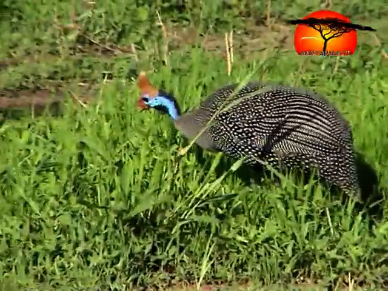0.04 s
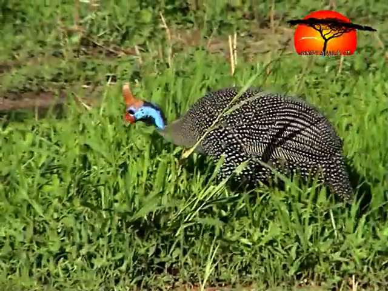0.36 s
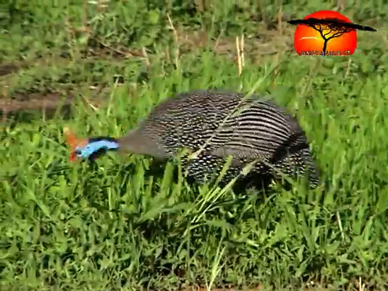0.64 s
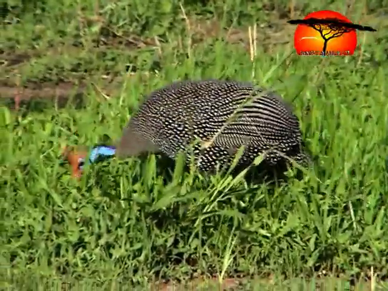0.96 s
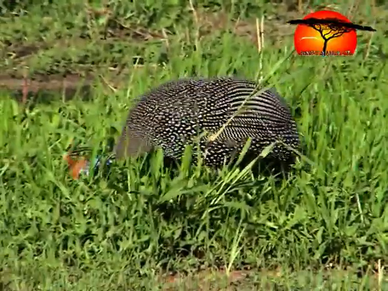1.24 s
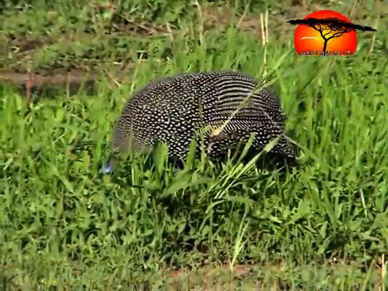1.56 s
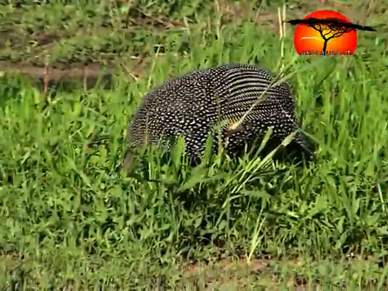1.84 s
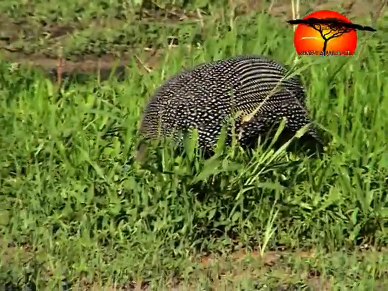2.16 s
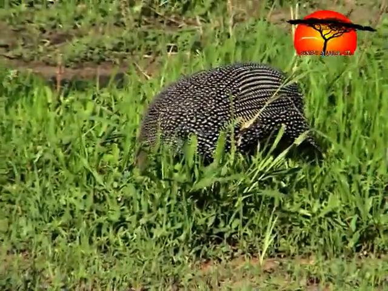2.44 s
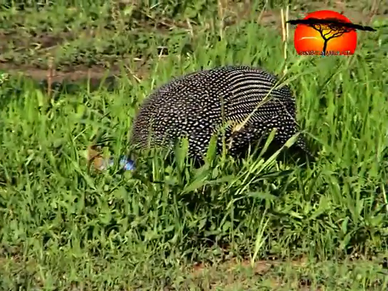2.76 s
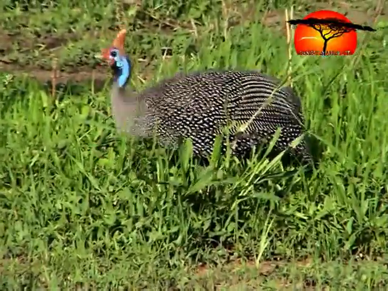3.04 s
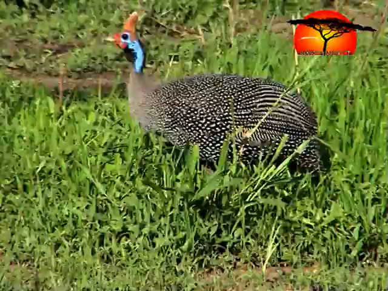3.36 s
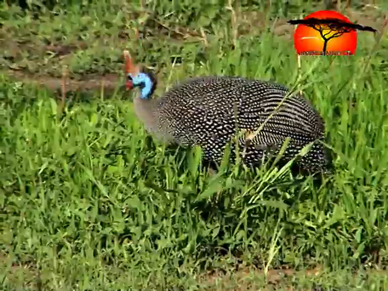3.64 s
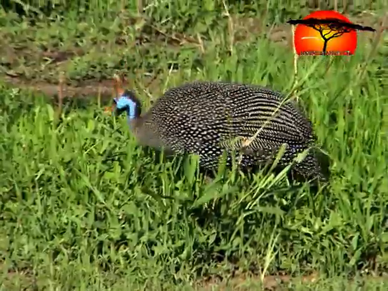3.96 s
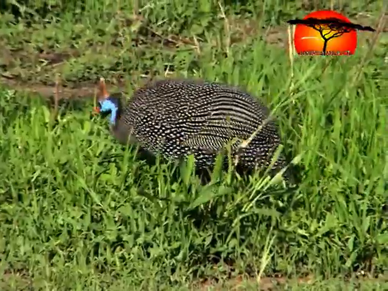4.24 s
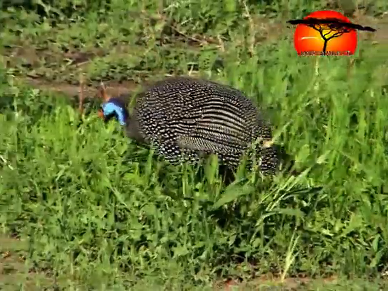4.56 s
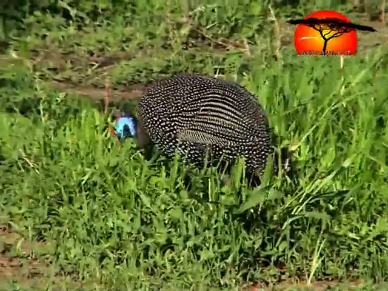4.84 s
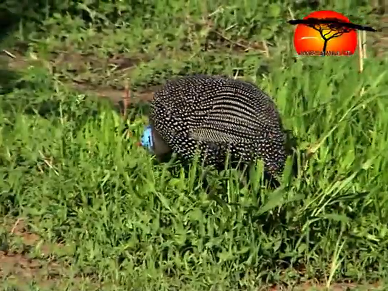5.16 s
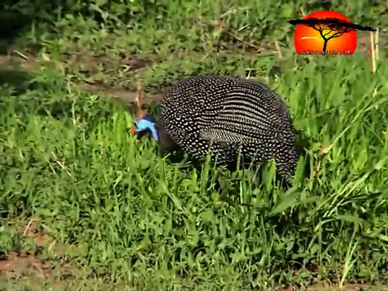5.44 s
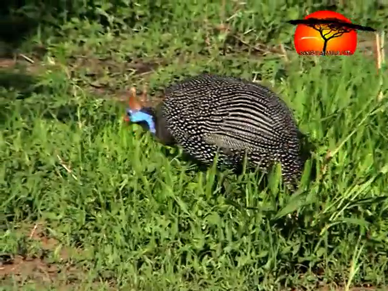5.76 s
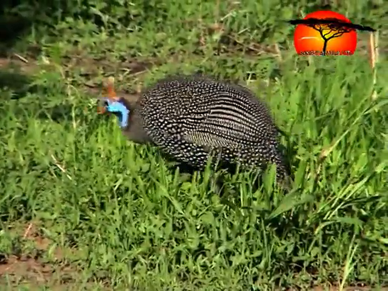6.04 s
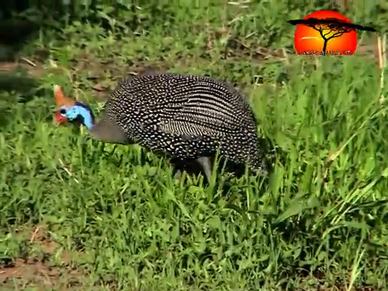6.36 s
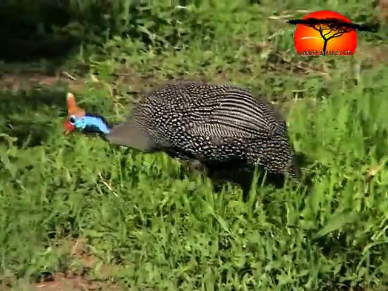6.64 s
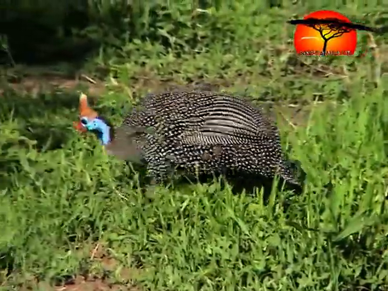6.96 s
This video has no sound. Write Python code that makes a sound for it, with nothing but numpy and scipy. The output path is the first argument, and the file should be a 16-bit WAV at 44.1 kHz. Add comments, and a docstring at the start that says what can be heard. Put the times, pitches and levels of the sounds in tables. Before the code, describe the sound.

Cicadas buzz, high and steady, across an open meadow. To the left a bird gives short raspy chirps twice a second and another answers with brief trills, while thin whistles come from far ahead. Wind gusts rumble and thump on the microphone, mostly in the first half. Just past the middle, something like a camera shutter clacks quickly up close. The wind then eases while the insects and birds carry on.

```python
"""Cicadas buzz all over a sunny meadow, clicking their tymbals, while gusts buffet the microphone.
To the left one bird chirps twice a second and another answers with short trills, both rasping as the
two sides of the syrinx beat. Far ahead are thin arched whistles, small peeps and a cooing dove.
Bush crickets sizzle and a fowl rustles the grass. Close by, a small mechanism like a camera shutter
gives one run of clacks, over the hush of open country and the recorder's faint whine."""
import sys
import numpy as np
from scipy import signal
from scipy.fft import rfft, irfft, next_fast_len
from scipy.io import wavfile
from scipy.ndimage import uniform_filter1d, map_coordinates

SR = 44100
rng = np.random.default_rng(int(sys.argv[2]) if len(sys.argv) > 2 else 0)


def output_pcm(signal):
    """Save a mono or channel-first signal as 16-bit PCM at the path in sys.argv[1].

    Samples are clipped to [-1, 1] before scaling.
    """
    pcm = np.clip(np.atleast_2d(signal).T, -1, 1) * 32767
    wavfile.write(sys.argv[1], SR, np.round(pcm).astype(np.int16))


N = 313110

# hush of open country: (frequency [Hz], relative level [dB])
AIR_SPECTRUM = [(20, -27.5), (100, -14), (250, 6), (500, 3.5), (950, 1.5), (1350, -1.5), (1800, -3.5),
                (2300, 0), (3600, -4), (5200, -5.5), (8000, -58), (10000, -10), (12000, -16)]
# how alike that hush is on both sides of the microphone: (frequency [Hz], correlation [0-1])
AIR_LIKENESS = [(100, 0.24), (500, 0.072), (1300, 0.041), (2700, 0.4), (6000, 0.59), (12000, 0.041)]
# tones of the recorder's whine: (frequency [Hz], level [dB])
WHINE_TONES = [(921, -75), (1016, -77.5), (3505, -77), (3600, -76.5), (4356, -76.5), (4576, -79),
               (4641, -81.5)]
# decay of sound off bushes and ground: (frequency [Hz], t60 [s])
MEADOW_DECAY = [(300, .3), (3000, 0.11), (10000, 0.027)]
# snapping stalks and soft steps in the grass: (time [s], level [dB], t60 [s], centre [Hz])
GRASS_RUSTLES = [(2.56, -53.5, 0.046, 2300), (2.702, -52, .04, 1280), (4.33, -58, .03, 10500),
                 (5.755, -52, 0.096, 2500), (6.405, -61, .03, 10500), (6.469, -56.5, .3, 440)]

# a far dove's run of coos: (time [s], pitch [Hz], level [dB])
DOVE_COOS = [(.23, 500, -66), (.315, 496, -66), (.395, 485, -64.5), (.48, 485, -68), (.565, 490, -66),
             (.65, 480, -66.5), (.74, 485, -67), (.84, 466, -68), (.94, 470, -67.5)]
# faint slurs from far off: (time [s], length [s], start pitch [Hz], end pitch [Hz], level [dB])
FAR_PEEPS = [(1.10, .06, 2720, 2580, -66), (1.10, .06, 4000, 3850, -66), (1.158, 0.015, 4900, 3500, -53),
             (1.345, .025, 5650, 5450, -58), (1.385, 0.034, 3400, 3900, -59),
             (1.407, 0.049, 3770, 4020, -57), (1.506, 0.04, 3080, 2700, -60),
             (3.145, 0.018, 4100, 4170, -58), (3.546, 0.023, 4400, 4300, -60),
             (4.325, .022, 4100, 4400, -61)]
# far whistles, all on the same note: (time [s], level [dB])
WHISTLE_NOTES = [(.599, -63), (.895, -59.5), (1.185, -54), (1.467, -51), (1.753, -53.5), (4.75, -59.5),
                 (5.038, -57.5), (5.336, -55.5), (5.623, -57.5), (5.911, -57), (6.199, -56.5)]
# arch of a whistle: (share of length [0-1], pitch over top pitch [ratio], relative level [dB])
WHISTLE_CONTOUR = [(0, .62, -6), (.08, .8, -1), (.22, .96, 2), (.34, 1, -9), (.6, 1, -12), (.7, .95, -2),
                   (.83, .72, 1.5), (1, .61, -6)]
# chirps that break into a warble: (time [s], length [s], pitch [Hz], level [dB], clean start [s])
CHIRP_NOTES = [(.455, 0.063, 1598, -48.5, .029), (.954, 0.056, 1594, -48, .022),
               (1.439, 0.074, 1612, -47, .027), (1.950, .066, 1618, -46.5, 0.026),
               (2.433, .068, 1626, -44.5, 0.022), (2.940, .067, 1593, -45.5, 0.0082),
               (3.458, 0.059, 1595, -46, .007), (3.939, .086, 1604, -46.5, .023),
               (4.434, .074, 1630, -46, 0.035), (4.931, .074, 1613, -47, 0.0194),
               (5.431, .066, 1617, -44.5, .013), (5.949, 0.06, 1600, -47.5, 0.016),
               (6.436, .075, 1617, -46.5, .012), (6.938, 0.071, 1616, -45.5, 0.037)]
# arch of a chirp: (share of length [0-1], pitch bend [ratio], relative level [dB])
CHIRP_CONTOUR = [(0, .92, -3), (.15, .965, -3), (.35, 1, -2.5), (.6, .985, -2), (.8, .95, -4.5),
                 (.92, .88, -10), (1, .76, -18)]
# the answering bird's trills: (time [s], length [s], pitch [Hz], level [dB])
TRILL_NOTES = [(-.012, 0.041, 1645, -43.5), (.388, 0.043, 1683, -44.5), (.804, .044, 1663, -44.5),
               (1.311, 0.035, 1637, -46), (1.709, 0.046, 1666, -45), (3.324, 0.047, 1620, -45),
               (3.744, 0.044, 1638, -45.5), (4.156, 0.046, 1628, -44), (6.146, 0.049, 1598, -46),
               (6.561, .05, 1668, -45.5)]
# course of a trill: (share of length [0-1], pitch bend [ratio], relative level [dB])
TRILL_CONTOUR = [(0, 0.96, -7.5), (.25, 0.96, -5.5), (.55, 0.99, -3), (.8, 0.94, -9), (1, .94, -11.5)]

# contacts in the shutter, close by: (time [s], relative level [dB], t60 [s], crack boost [dB])
SHUTTER_CONTACTS = [(3.882, -35.5, 0.085, 3), (3.901, -40.5, 0.094, -1), (3.962, -41, 0.1, 0),
                    (4.038, -42, 0.14, 0), (4.058, -62, 0.15, 15), (4.096, -48.5, 0.089, -13),
                    (4.27, -51.5, 0.048, -10)]
# resonances of its casing: (frequency [Hz], width [Hz], relative level [dB])
CASING_MODES = [(750, 75, 4.5), (1090, 170, -1), (1690, 170, -4), (1990, 110, -2.5), (2500, 160, -5.5),
                (3530, 190, -8.5), (4820, 270, -21)]
# dry crack of a contact: (frequency [Hz], relative level [dB])
CRACK_SPECTRUM = [(200, -19), (450, 7.5), (700, 0.5), (3500, 3), (6000, -2), (9000, -6), (13000, -12.5)]

# gusts on the microphone: (time [s], length [s], relative rumble [dB], relative buffeting [dB])
WIND_GUSTS = [(0, 0.35, -48, -54.5), (.6, 0.24, -44.5, -48), (0.986, 0.14, -35, -46),
              (1.15, 0.18, -48, -48), (1.459, 0.026, -40.5, -45), (1.519, .17, -37.5, -39),
              (1.77, .3, -39, -40.5), (2.125, .17, -40.5, -45.5), (2.371, 0.052, -36.5, -42),
              (2.49, 0.18, -45, -54.5), (2.85, 0.054, -41, -38), (2.977, 0.1, -44, -45),
              (3.202, 0.043, -44.5, -44), (3.323, .06, -34, -43), (3.42, .15, -38, -32.6),
              (3.602, .05, -40.5, -37.5), (3.903, .21, -42.5, -48.5), (4.206, 0.15, -51, -65.5),
              (4.5, 0.27, -50, -62), (4.868, 0.12, -50.5, -68), (5.204, 0.2, -57.5, -69.5),
              (5.607, 0.36, -55, -63), (6.26, .1, -53, -67), (6.49, .08, -52, -66), (6.627, .31, -46, -52)]
# light air between gusts: (time [s], relative rumble [dB], relative buffeting [dB])
BREEZE_LEVELS = [(0, -57.5, -67), (3.5, -52, -61), (5.3, -65.5, -73.5), (7.1, -55, -70)]
# deep rumble of the wind: (frequency [Hz], relative level [dB])
RUMBLE_SPECTRUM = [(10, -30), (25, -3.5), (45, -0.5), (85, -0.5), (110, -3.5), (150, -16.5), (300, -59)]
# buffeting just above the rumble: (frequency [Hz], relative level [dB])
BUFFET_SPECTRUM = [(70, -26), (110, 0.5), (160, -0.5), (230, -8.5), (330, -19), (500, -29), (1000, -75)]
# brighter flutter of small eddies: (frequency [Hz], relative level [dB])
FLUTTER_SPECTRUM = [(150, 1), (370, 1.5), (480, -9.5), (700, -11), (1200, -22), (2500, -45)]
# single eddies that thump the microphone: (time [s], frequency [Hz], relative level [dB])
EDDY_THUMPS = [(0.604, 110, -29.5), (1.074, 325, -34.5), (1.118, 162, -22.5), (1.614, 142, -25),
               (1.93, 234, -36), (2.861, 86.5, -22.5), (2.894, 124, -24), (3.419, 101, -19),
               (3.454, 402, -29), (3.508, 550, -28), (3.549, 350, -26)]

# cicadas nearest the microphone: (tymbal click rate [1/s], relative level [dB])
NEAR_CICADAS = [(370.2, -5.5), (380.1, -7), (404.6, -4)]
# ring of a tymbal: (frequency [Hz], relative level [dB])
TYMBAL_SPECTRUM = [(5000, -27), (5800, -17.5), (6300, -8), (6750, -3), (7200, -1), (7650, -4), (8100, -8),
                   (8500, -16.5), (8900, -18), (9500, -22.5), (9800, -33), (11000, -61)]
# ringing peaks of the far cicadas: (frequency [Hz], width [Hz], relative level [dB])
SHRILL_PEAKS = [(6800, 55, 0), (6965, 21, 4.5), (6880, 140, -11), (7190, 113, 2), (7530, 41, -2),
                (7600, 38, 1.5), (8670, 52, 5)]
# slow swell of the whole chorus: (time [s], relative level [dB])
CHORUS_SWELL = [(0.0, -43.5), (0.28, -44), (0.35, -45.5), (1.88, -45.5), (2.43, -45), (2.51, -48),
                (2.69, -45), (4.29, -46), (4.49, -47.5), (5.12, -44.5), (5.26, -45.5), (7.1, -45.5)]


def amp(db):
    """Decibels to gain."""
    return 10 ** (np.asarray(db) / 20)


def unit(x):
    """Scale to rms 1."""
    return x / np.sqrt(np.mean(x ** 2) + 1e-20)


def along(points, hz):
    """(frequency [Hz], value) points read on a log axis."""
    freqs, values = np.transpose(points)
    return np.interp(np.log(hz + 1), np.log(freqs + 1), values)


def curves(rows, at):
    """Each column after the first, read at the given places."""
    places, *columns = np.transpose(rows)
    return [np.interp(at, places, column) for column in columns]


def wobble(rate, size=N):
    """A smooth random curve, rate knots a second."""
    knots = rng.standard_normal(int(size * rate / SR) + 4)
    return map_coordinates(knots, [np.arange(size) * rate / SR])


def sweep(hz):
    """Running phase of a moving pitch."""
    return 2 * np.pi * np.cumsum(hz) / SR


def filtered(x, response):
    """x through a frequency response."""
    size = next_fast_len(x.shape[-1] + SR // 2)
    hz = np.fft.rfftfreq(size, 1 / SR)
    return irfft(rfft(x, size) * response(hz), size)[..., :x.shape[-1]]


def coloured(x, spectrum):
    """x shaped by a (frequency [Hz], level [dB]) spectrum, at rms 1."""
    return unit(filtered(x, lambda hz: amp(along(spectrum, hz))))


def resonant(x, peaks):
    """x through resonances of alternating sign, at rms 1."""
    def response(hz):
        return sum((-1) ** k * amp(db) * 1j * hz * width / (centre ** 2 - hz ** 2 + 1j * hz * width)
                   for k, (centre, width, db) in enumerate(peaks))
    return unit(filtered(x, response))


def noise_pair(alike):
    """White stereo noise with a given left-right likeness."""
    mid, side = rng.standard_normal((2, N))
    turn = np.arccos(alike) / 2
    return np.cos(turn) * mid + np.sin(turn) * np.array([side, -side])


def panned(x, pan_db):
    """Make the left louder than the right by pan_db."""
    return x * amp(np.array([[.5], [-.5]]) * pan_db)


def add(track, s, sound):
    """Mix a sound into a track at time s."""
    at = round(s * SR) + np.arange(sound.shape[-1])
    inside = (at >= 0) & (at < N)
    track[..., at[inside]] += sound[..., inside]


def note(t, length, db, edge_s):
    """A soft-edged envelope that holds a sine at db rms."""
    return np.sqrt(2) * amp(db) * np.clip(np.minimum(t, length - t) / edge_s, 0, 1)


def background(air_db=-59, waver_db=2):
    """The hush of open country all around, and the recorder's thin whine."""
    def turn(hz):
        return np.arccos(along(AIR_LIKENESS, hz)) / 2
    mid, side = coloured(rng.standard_normal((2, N)), AIR_SPECTRUM)
    centre = filtered(mid, lambda hz: np.cos(turn(hz)))
    width = filtered(np.array([side, -side]), lambda hz: np.sin(turn(hz)))
    whine = sum(np.sqrt(2) * amp(db + waver_db * wobble(5)) * np.sin(sweep(hz + 3 * wobble(20)))
                for hz, db in WHINE_TONES)
    hush = amp(air_db + .6 * wobble(3.294)) * (centre + width)
    return panned(hush + whine, 0.88)


def scattered(x):
    """Bushes and ground send a short diffuse tail back to the microphone."""
    hz, t, bands = signal.stft(rng.standard_normal((2, SR // 2)), SR, nperseg=256)
    decay = amp(-60 * t / along(MEADOW_DECAY, hz)[:, None])
    tail = signal.istft(bands * decay, SR, nperseg=256)[1]
    return signal.fftconvolve(x[None], tail / np.linalg.norm(tail[0]), axes=1)[:, :N]


def crickets(centre_hz=8950, wander_hz=240, level_db=-65, flutter_db=4, count=4):
    """Small bush crickets sizzle above the cicadas, unsteady in pitch and strength."""
    track = np.zeros(N)
    for _ in range(count):
        hz = centre_hz + wander_hz * wobble(35) + 200 * wobble(1400)
        track += amp(flutter_db * wobble(18)) * np.sin(sweep(hz))
    return amp(level_db) * unit(track)


def dove(length_s=0.053):
    """Far across the meadow a dove coos softly, the run sinking slowly in pitch."""
    track, t = np.zeros(N), np.arange(SR // 8) / SR
    for s, hz, db in DOVE_COOS:
        add(track, s, note(t, length_s, db, edge_s=0.015) * np.sin(2 * np.pi * hz * t))
    return track


def peeps():
    """Small distant birds slur single notes."""
    track, t = np.zeros(N), np.arange(SR // 8) / SR
    for s, length, start_hz, end_hz, db in FAR_PEEPS:
        hz = np.interp(t, [0, length], [start_hz, end_hz])
        add(track, s, note(t, length, db, edge_s=0.013) * np.sin(sweep(hz)))
    return track


def whistler(length_s=.045, top_hz=3984):
    """A bird far ahead whistles thin pure notes that shoot up and fall back."""
    track, t = np.zeros(N), np.arange(SR // 6) / SR
    bend, contour_db = curves(WHISTLE_CONTOUR, t / length_s)
    for s, db in WHISTLE_NOTES:
        hz = top_hz * bend * (1 + 0.019 * wobble(313, len(t)))
        level_db = db + contour_db + 0.81 * wobble(270, len(t))
        add(track, s, note(t, length_s, level_db, edge_s=0.0027) * np.sin(sweep(hz)))
    return track


def rustles():
    """A foraging fowl bends and snaps grass stalks."""
    track, t = np.zeros(N), np.arange(SR // 8) / SR
    for s, db, t60, hz in GRASS_RUSTLES:
        stalk = coloured(rng.standard_normal(len(t)), [(hz / 3, -25), (hz, 0), (hz * 3, -35)])
        grainy_decay = amp(db - 60 * t / t60 + 3.2 * wobble(410, len(t)))
        attack = 1 - np.exp(-20 * t / t60)
        add(track, s, attack * grainy_decay * stalk)
    return track


def syrinx_calls(notes, contour, warble_hz, dip, lower_db, lower_ratio, rough, first_db, third_db):
    """One side of the syrinx sings, strongest in its second harmonic; the other beats against it."""
    track, t = np.zeros(N), np.arange(SR // 8) / SR
    for s, length, pitch_hz, db, clean_s in notes:
        bend, contour_db = curves(contour, t / length)
        broken = np.clip((t - clean_s) / 0.0029, 0, 1)  # 0 while clean, 1 once warbling
        turns = np.cumsum(broken * warble_hz * (1 + 0.27 * wobble(81, len(t)))) / SR
        burst = broken * np.abs(np.sin(np.pi * (turns + 1 / 4))) ** 3  # the lower side cuts in
        jitter = rough * (0.62 + broken) * wobble(1133, len(t))
        phase = sweep(pitch_hz * bend * (1 - dip * burst + jitter))
        odd_harmonics = amp(first_db) * np.sin(phase) + amp(third_db) * np.sin(3 * phase)
        upper = (np.sin(2 * phase) + odd_harmonics) * (1 - 0.86 * burst)
        lower_gain = amp(lower_db + 2.3 * wobble(256, len(t))) * burst
        lower = lower_gain * np.sin(2 * lower_ratio * phase + rng.uniform(0, 2 * np.pi))
        rasp = amp(-10) * (0.37 + burst) * wobble(1299, len(t)) * np.sin(1.62 * phase)
        add(track, s, note(t, length, db + contour_db, edge_s=0.00042) * (upper + lower + rasp))
    return track


def shutter(ring_db=-1, crack_db=-3, grain_db=1):
    """Close to the microphone, each contact rattles a small casing and adds a dry crack."""
    body, edge, t = np.zeros(N), np.zeros(N), np.arange(SR // 5) / SR
    for s, db, t60, boost_db in SHUTTER_CONTACTS:
        blow = amp(db - 60 * t / t60) * (1 - np.exp(-t / 0.00059))
        add(body, s, blow)
        add(edge, s, blow * amp(boost_db))
    ring = amp(ring_db) * body * resonant(noise_pair(alike=1.0), CASING_MODES)
    crack = amp(crack_db) * edge * coloured(noise_pair(alike=0.57), CRACK_SPECTRUM)
    return panned((ring + crack) * amp(-grain_db * wobble(500)), 1.2)


def gust_levels(attack_s=0.016, release_s=0.028, sag_db_per_s=3):
    """Rumble and buffeting in dB: gusts swell, sag and die away over a light breeze."""
    t = np.arange(N) / SR
    power = amp(curves(BREEZE_LEVELS, t)) ** 2
    for s, length, *levels_db in WIND_GUSTS:
        held_s = np.clip(t - s, 0, length)
        edges = np.maximum(s - t, 0) / attack_s + np.maximum(t - s - length, 0) / release_s
        envelope = amp(-sag_db_per_s * held_s) * np.exp(-edges)
        power += np.outer(amp(levels_db), envelope) ** 2
    return 10 * np.log10(power)


def wind(lump_db=2.4, surge_db=2.0, puff_db=3, strong_gust_db=-35.5, flutter_growth=2.34):
    """Gusts buffet the microphone in surges; the strong ones shed smaller, brighter eddies."""
    rumble_db, buffet_db = gust_levels()
    flutter_db = -43.5 + flutter_growth * (buffet_db - strong_gust_db)
    surges = unit(amp(lump_db * wobble(45) + surge_db * wobble(20.98)))
    rumble = amp(rumble_db + 0.7) * coloured(noise_pair(alike=0.8), RUMBLE_SPECTRUM)
    buffet = amp(buffet_db + 1.05) * coloured(noise_pair(alike=0.84), BUFFET_SPECTRUM)
    flutter = amp(flutter_db) * coloured(noise_pair(alike=0.23), FLUTTER_SPECTRUM)
    puffs = unit(amp(puff_db * wobble(70)))  # small eddies pass one by one
    air = surges * (rumble + buffet + puffs * flutter)
    t = np.arange(-SR // 20, SR // 20) / SR
    for s, hz, db in EDDY_THUMPS:
        push_pull = np.sin(2 * np.pi * hz * t) * np.exp(-(1.93 * hz * t) ** 2)
        add(air, s + t[0], amp(db) * push_pull)
    return panned(air, -1.05)


def patchy(x, depth_db):
    """Narrow bands swell and sink, each at its own pace."""
    bands = signal.stft(x, nperseg=1024)[2]
    swell = uniform_filter1d(rng.standard_normal(bands.shape[1:]), size=4, axis=0)  # across frequency
    swell = uniform_filter1d(swell, size=12, axis=1)  # across time
    return signal.istft(bands * amp(depth_db * unit(swell)), nperseg=1024)[1][:, :N]


def tymbal_clicks(rate, scatter_s=.00003, drift=.002):
    """One cicada's tymbal: a nearly regular click train whose rate drifts a little."""
    cycles = np.cumsum(rate * (1 + drift * wobble(3))) / SR
    at = np.interp(np.arange(1, int(cycles[-1])), cycles, np.arange(N))
    at += scatter_s * SR * rng.standard_normal(N)[:len(at)]
    samples = np.clip(np.round(at).astype(int), 0, N - 1)
    return unit(np.bincount(samples, minlength=N).astype(float))


def cicadas(near_db=-4, shrill_db=-3, echo_db=-17, flicker_db=0.29):
    """A few cicadas click their tymbals near the microphone; the far ones merge into a ringing hiss."""
    swell_db, = curves(CHORUS_SWELL, np.arange(N) / SR)
    pan_db = -2 + wobble(3.38)  # swaying a little right of centre
    near = coloured(sum(amp(db) * tymbal_clicks(rate) for rate, db in NEAR_CICADAS), TYMBAL_SPECTRUM)
    crowd = coloured(patchy(noise_pair(alike=0.12), depth_db=1.5), TYMBAL_SPECTRUM)
    shrill = coloured(resonant(noise_pair(alike=0.99), SHRILL_PEAKS), TYMBAL_SPECTRUM)
    chorus = amp(near_db) * near + crowd + amp(shrill_db) * shrill
    delays_s = rng.uniform(.003, .011, size=4)

    def branch_echoes(hz):
        return 1 + amp(echo_db) * sum(np.exp(-2j * np.pi * hz * delay) for delay in delays_s)
    chorus = unit(filtered(chorus, branch_echoes))
    return panned(chorus * amp(swell_db + 0.91 + flicker_db * wobble(16)), pan_db)


def scene():
    """From the microphone: two calling birds to the left, the others far ahead, cicadas all around."""
    chirps = syrinx_calls(CHIRP_NOTES, CHIRP_CONTOUR, warble_hz=77.5, dip=0.012, lower_db=2,
                          lower_ratio=.925, rough=.017, first_db=-9.5, third_db=-10)
    trill_notes = [(*row, .002) for row in TRILL_NOTES]  # a trill stays clean for only 2 ms
    trills = syrinx_calls(trill_notes, TRILL_CONTOUR, warble_hz=97.5, dip=0.0373, lower_db=3,
                          lower_ratio=0.99, rough=0.019, first_db=-7, third_db=-16.5)
    far = whistler() + peeps() + dove()
    birds = panned(chirps, 5.3) + panned(trills, 5.2) + panned(far, 0.64)
    birds += amp(-10) * scattered(chirps + trills + far)
    return birds + cicadas() + crickets() + wind() + rustles() + shutter() + background()


def record(dry):
    """The recorder keeps nothing above its band limit."""
    return filtered(dry, lambda hz: hz < 12150)


dry = scene()
out = record(dry)
output_pcm(out)
```